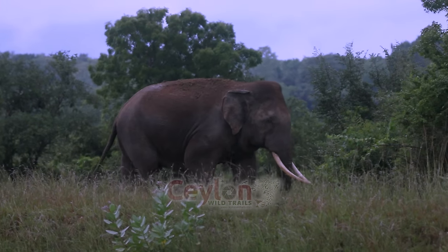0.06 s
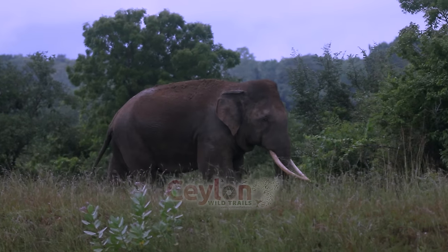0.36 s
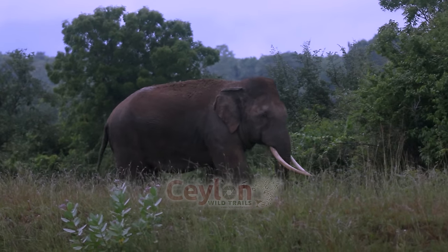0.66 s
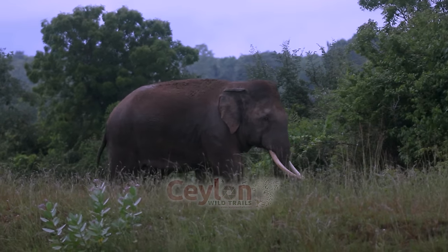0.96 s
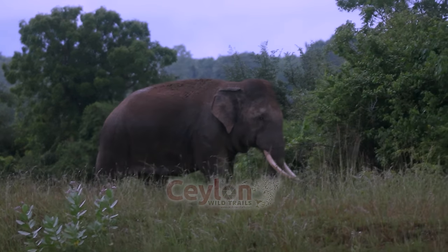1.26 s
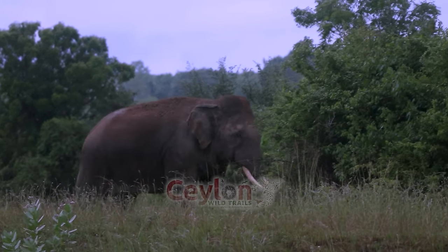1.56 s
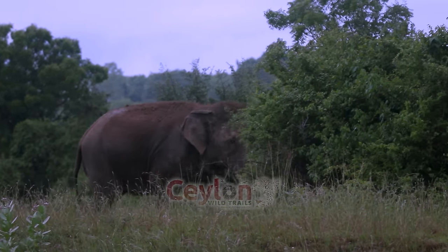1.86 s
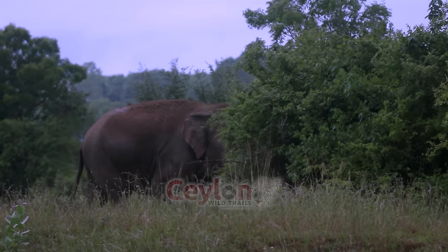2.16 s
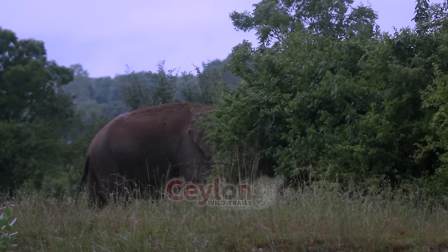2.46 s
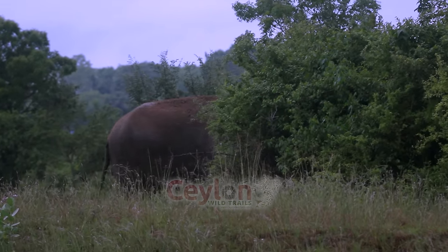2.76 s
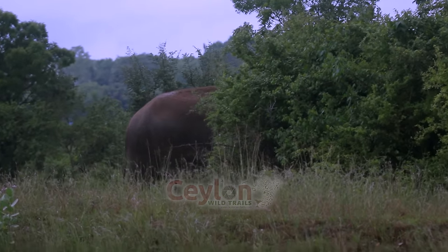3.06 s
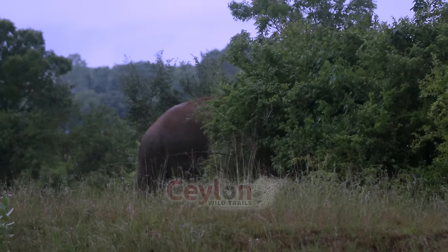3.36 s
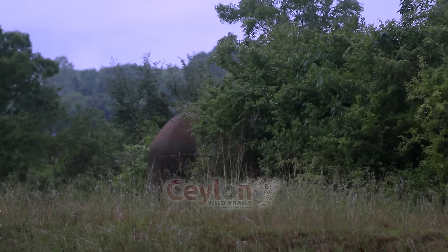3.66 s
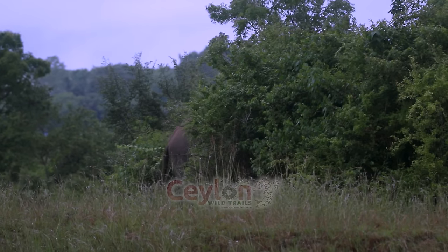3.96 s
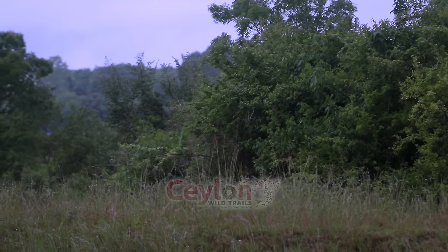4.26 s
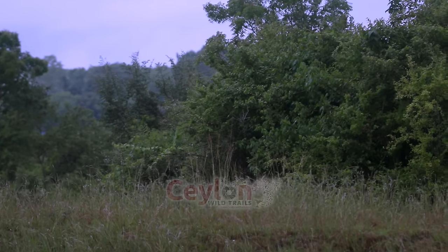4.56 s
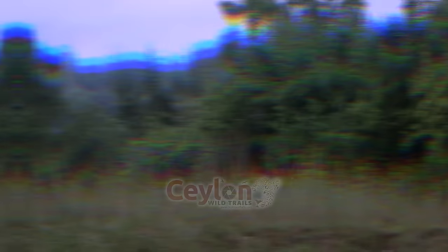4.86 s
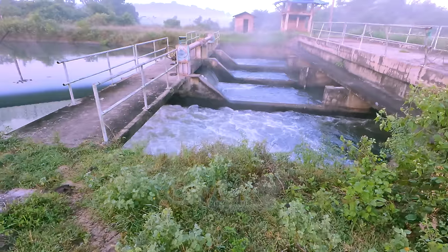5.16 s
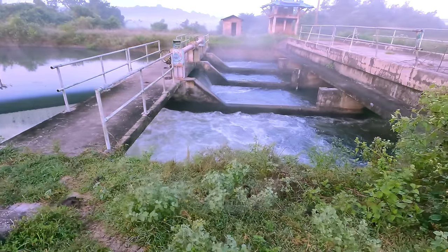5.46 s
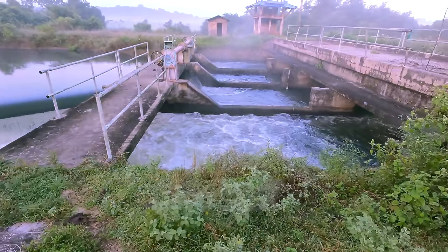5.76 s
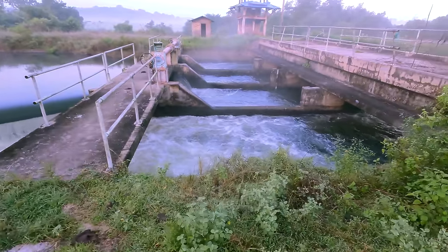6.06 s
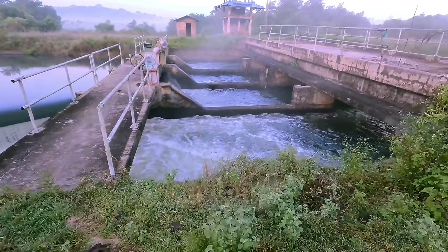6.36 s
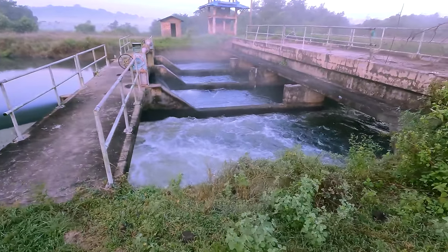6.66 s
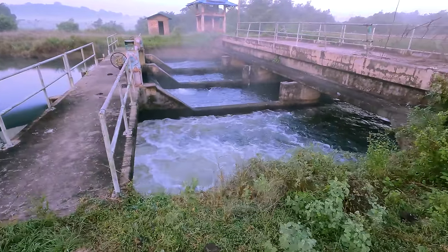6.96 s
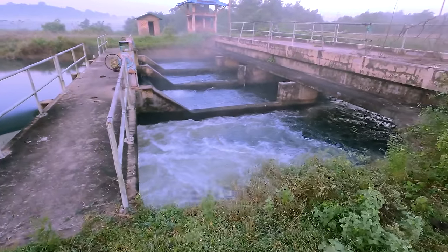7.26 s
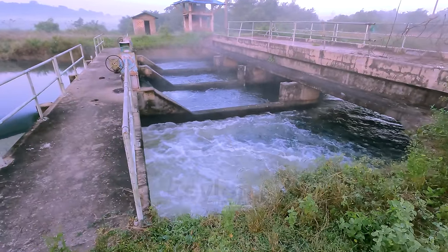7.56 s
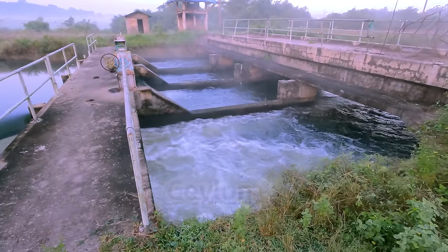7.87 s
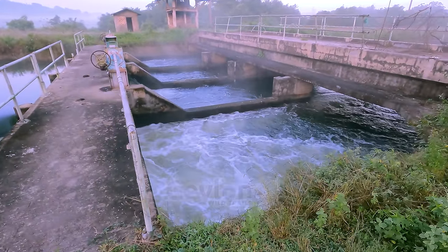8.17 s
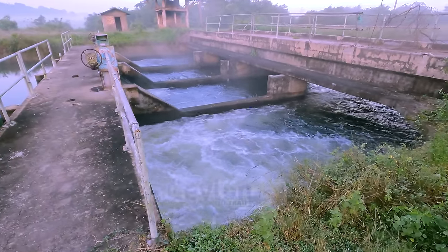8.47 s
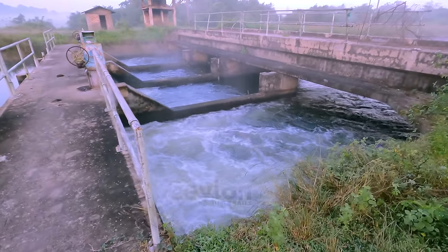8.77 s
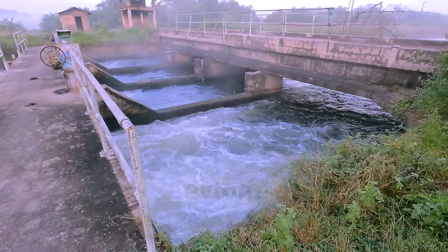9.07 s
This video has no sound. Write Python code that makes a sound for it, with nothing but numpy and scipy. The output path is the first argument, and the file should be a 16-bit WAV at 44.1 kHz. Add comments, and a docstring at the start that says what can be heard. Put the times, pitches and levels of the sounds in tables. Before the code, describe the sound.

Small birds twitter over soft cricket rasping before loud, churning sluice water abruptly takes over and keeps growing.

```python
"""A quiet scrub meadow, then, after an instant of silence, a canal sluice. In the meadow, distant air washes
over a low hum, bush crickets rasp their wings and small birds chip and whistle. At the sluice, water plunges
from the gates into a concrete basin: it rumbles, and the air it drags under rings as bubbles. The water grows
louder as the microphone walks closer, and slaps the surface twice. At the end the sound opens wider and turns
brighter."""
import sys
import numpy as np
from scipy import signal
from scipy.fft import rfft, irfft, next_fast_len
from scipy.io import wavfile
from scipy.ndimage import uniform_filter1d, map_coordinates

SR = 44100
rng = np.random.default_rng(int(sys.argv[2]) if len(sys.argv) > 2 else 0)


def materialize(psi):
    """Save the field psi as 16-bit PCM at rate SR to the path in sys.argv[1].

    A 1-D psi becomes a single channel; in a 2-D psi each row is a channel.
    """
    bounded = np.clip(np.atleast_2d(psi).T, -1, 1)
    quanta = np.round(bounded * 32767).astype(np.int16)
    wavfile.write(sys.argv[1], SR, quanta)


N = 402191
MEADOW_END_S, SLUICE_START_S = 4.941, 5.019


def amp(db):
    """Turn decibels (dB) into a number to multiply a sound by."""
    return 10 ** (np.asarray(db) / 20)


def unit(x):
    """Scale a sound so its average strength (rms) is 1."""
    return x / np.sqrt(np.mean(x ** 2) + 1e-20)


def along(points, hz):
    """Read between (Hz, value) points, with octaves evenly spaced."""
    point_hz, values = np.transpose(points)
    return np.interp(np.log(hz + 1), np.log(point_hz + 1), values)


def wobble(rate):
    """A smooth random curve through `rate` new values a second."""
    return map_coordinates(rng.standard_normal(int(N * rate / SR) + 4), [np.arange(N) * rate / SR])


def ramp(start_s):
    """Seconds gone by since start_s, zero before it."""
    return np.maximum(np.arange(N) / SR - start_s, 0)


def filtered(x, response):
    """Multiply each frequency in a sound by response(hz)."""
    size = next_fast_len(N + SR // 2)
    return irfft(rfft(x, size) * response(np.fft.rfftfreq(size, 1 / SR)), size)[..., :N]


def coloured(x, spectrum):
    """Shape a sound's tone with (Hz, dB) points, then scale it to strength 1."""
    return unit(filtered(x, lambda hz: amp(along(spectrum, hz))))


def patchy(depth_db):
    """White noise with random louder and softer patches in time and pitch."""
    grid = signal.stft(rng.standard_normal(N), nperseg=512)[2]
    patches = uniform_filter1d(rng.standard_normal(grid.shape), size=6, axis=0)
    patches = uniform_filter1d(patches, size=10, axis=1)
    return unit(signal.istft(grid * amp(depth_db * unit(patches)), nperseg=512)[1][:N])


def add(track, s, sound):
    """Mix a sound into a track, starting at s seconds."""
    start = round(s * SR)
    part = sound[max(-start, 0):N - start]
    track[max(start, 0):][:len(part)] += part


def air(level_db=-59.5, left_lead_s=.00004):
    """The far-off wash of open country, wide in the treble, reaching the left ear first."""
    # The tone of the wash. Each row: frequency in Hz, relative level in dB.
    tone = [(25, -30), (50, -13), (75, -12), (150, -3), (420, -1.5), (540, 2), (850, -1.5), (1000, 0),
            (1150, -3), (1750, -3.5), (2300, -6.5), (5000, -9.5), (9000, -18.5), (15700, -26)]
    # How alike the two ears are. Each row: frequency in Hz, likeness from 0 to 1.
    likeness = [(200, .96), (800, 0.93), (1500, 0.58), (2900, 0.31), (5500, 0.022)]
    spread = lambda hz: np.arccos(np.clip(along(likeness, hz), -1, 1)) / 2
    shares = lambda hz: [np.cos(spread(hz)), np.sin(spread(hz))]
    noise = np.array([patchy(depth_db=1.46), patchy(depth_db=.5)])
    mid, side = filtered(noise, lambda hz: amp(along(tone, hz)) * shares(hz))
    ears = np.array([mid + side, mid - side])
    ears = filtered(ears, lambda hz: np.exp(1j * np.pi * hz * left_lead_s * np.array([[1], [-1]])))
    return amp(level_db + .45 * wobble(3.06)) * unit(ears)


def hum(pitch_hz=98.6, level_db=-78):
    """A faint low tone that wavers in loudness and pitch."""
    gain = amp(level_db + 1.3 * wobble(7.84))
    phase = 2 * np.pi * np.cumsum(pitch_hz + 2 * wobble(8.2)) / SR
    return gain * unit(np.sin(phase))


def wing_rasp(lower_by_hz):
    """Each stroke of a cricket's wings is a burst of high, narrow noise."""
    # The tone of a wing. Each row: frequency in Hz, relative level in dB.
    tone = [(8800, -35), (9550, -11), (9850, -1), (10450, 0), (10750, -7), (11300, -28), (12500, -60)]
    stroke_hz = 149.5 + .86 * wobble(2)
    strokes = amp(3.7 * np.cos(2 * np.pi * np.cumsum(stroke_hz) / SR))
    noise = coloured(rng.standard_normal((2, N)), [(hz - lower_by_hz, db) for hz, db in tone])
    return unit(strokes * noise)


def crickets(swell_s=.58):
    """Bush crickets to the left: a steady chorus, and a nearer one that swells and stops dead."""
    # The near cricket's buzzes. Each row: start in seconds, stop in seconds.
    buzzes = [(0.6, 2.18), (2.4, 4.51), (4.6, 4.95)]
    t = np.arange(N) / SR
    effort = sum(np.minimum(ramp(start) / swell_s, 1) * (t < stop) for start, stop in buzzes)
    chorus = amp(-78.5) * wing_rasp(lower_by_hz=0)
    near = amp(-76.5) * effort * wing_rasp(lower_by_hz=110)
    return (chorus + near) * amp([[2.5], [-1.5]])  # left, right


def note(hz, db, rough):
    """A bird's whistle swells and fades along a pitch path, with a fast quiver."""
    swell = signal.windows.tukey(len(hz), .7)
    quiver, flutter = unit(uniform_filter1d(rng.standard_normal((2, len(hz))), size=130, axis=1))
    phase = 2 * np.pi * np.cumsum(hz * (1 + rough * quiver)) / SR
    return amp(db) * unit(swell * amp(2 * flutter) * np.sin(phase))


def arch(length_s, top_hz, bend, crest=0):
    """A pitch path that rises to a crest (-1 is the start, 1 the end) and falls away."""
    position = np.linspace(-1, 1, int(length_s * SR))
    crest = crest + rng.uniform(-.12, .12)
    away = np.abs(position - crest) / (1 + abs(crest))
    return top_hz * (1 - bend * rng.uniform(.8, 1.2) * away ** 1.7)


def near_birds(call_gap_s=.127, flick_gap_s=.054, sag_hz=100, fade_db=1.5):
    """Evenly paced calls, slurred answers, and runs of flicks that sink and fade."""
    # One bird's repeated calls. Each row: middle of the first call in seconds, number of calls,
    # top pitch in Hz, relative level in dB.
    phrases = [(0.6, 1, 5600, -66), (1.032, 4, 6120, -64.5), (1.56, 3, 6100, -65.5), (2.08, 1, 5750, -65.5),
               (2.959, 3, 6000, -66.5), (3.938, 2, 5950, -66.5)]
    # Another's answers. Each row: middle and length in seconds, top pitch in Hz, relative level in dB.
    slurs = [(0.3, .12, 5320, -68), (1.105, .096, 5470, -60), (1.602, .046, 5600, -62),
             (2.174, .08, 5300, -68), (2.877, 0.092, 5300, -68), (3.044, 0.035, 5420, -64),
             (3.128, 0.063, 5580, -62), (3.718, 0.075, 4660, -71), (4.419, .09, 6400, -67)]
    # Quick downward flicks. Each row: middle of the first flick in seconds, number of flicks,
    # first top pitch in Hz, first relative level in dB.
    runs = [(0.01, 2, 5150, -60.5), (0.37, 3, 5250, -68), (0.695, 4, 5450, -62.5), (1.9, 3, 5620, -66),
            (2.765, 2, 5650, -65), (3.255, 8, 5660, -63), (4.152, 3, 5430, -70), (4.492, 3, 5400, -64.5),
            (4.825, 3, 5500, -68)]
    notes = [(s + k * call_gap_s, arch(.078, hz, bend=.23), db)
             for s, count, hz, db in phrases for k in range(round(count))]
    notes += [(s, arch(length, hz, bend=.081), db) for s, length, hz, db in slurs]
    notes += [(s + k * flick_gap_s, arch(.024, hz - k * sag_hz, bend=.15, crest=-.6), db - k * fade_db)
              for s, count, hz, db in runs for k in range(round(count))]
    track = np.zeros(N)
    for middle_s, path, db in notes:
        add(track, middle_s - len(path) / SR / 2, note(path, db, rough=.007))
    return amp(-2.5) * track


def flock(near, count=380, memory_s=.3):
    """A flock farther back twitters in tiny flicks, louder while the near birds call."""
    track = np.zeros(N)
    for when, pitch, span, slope, strength, kind in rng.random((count, 6)):
        high = kind < .14  # a few flicks are higher and softer
        centre_hz = (7000 + 1400 * pitch) if high else (3700 + 1850 * np.sqrt(pitch))
        position = np.linspace(-1, 1, int((.012 + .02 * span) * SR))
        glide = .07 - .18 * slope  # most fall
        flick = note(centre_hz * (1 + glide * position), 6 * strength - 6 * high, rough=.012)
        add(track, when * MEADOW_END_S, flick)
    calling = np.sqrt(np.abs(uniform_filter1d(near ** 2, int(memory_s * SR))))
    return np.hypot(amp(-86), amp(-6) * calling) * unit(track)


def far_birds():
    """Distant birds slide through short whistles."""
    # The whistles. Each row: start and length in seconds, first and last pitch in Hz,
    # relative level in dB.
    whistles = [(.1, 0.085, 4400, 3970, -70), (2.075, .07, 4130, 3910, -69), (2.099, .14, 1890, 1980, -74),
                (2.347, 0.13, 1016, 940, -69), (2.658, 0.16, 2140, 2020, -75),
                (2.851, .16, 1690, 1550, -72), (2.877, 0.077, 1000, 980, -66.5),
                (3.5, 0.032, 7200, 6600, -74), (4.41, .03, 7870, 7210, -73), (4.42, .06, 6400, 6800, -77.5)]
    track = np.zeros(N)
    for s, length, start_hz, end_hz, db in whistles:
        add(track, s, note(np.linspace(start_hz, end_hz, int(length * SR)), db - 2.5, rough=.012))
    return track


def among_trees(x, echo_db, fade_s):
    """A sound plus its scatter from leaves and trunks, different at each ear."""
    t = np.arange(SR // 2) / SR
    tail = rng.standard_normal((2, len(t))) * amp(-60 * t / fade_s) * (1 - np.exp(-t / .0038))
    tail /= np.linalg.norm(tail[0])
    return x + amp(echo_db) * signal.fftconvolve(x[None], tail, axes=1)[:, :N]


def birds():
    """All the birds among the trees; the distant ones echo longer."""
    near, far = near_birds(), far_birds()
    chatter = among_trees(near + flock(near), echo_db=-6.5, fade_s=.068)
    return chatter + among_trees(far, echo_db=0, fade_s=.6)


def plunge():
    """The falling jet pounds the basin and makes it rumble."""
    # The tone of the rumble. Each row: frequency in Hz, relative level in dB.
    tone = [(12, -14), (24, -4), (40, -3), (60, 0), (85, 1.5), (102, -1), (145, 0), (210, -4.5),
            (300, -12.5), (400, -19.5), (800, -73)]
    return amp(-27 + .31 * wobble(10)) * coloured(patchy(depth_db=.54), tone)


def bubbles(count, low_hz, high_hz, cycles, spread_db):
    """Air pockets ring for a few cycles, rising in pitch as they near the surface."""
    when, pitch, strength, span = rng.random((count, 4)).T[:, :, None]
    hz = low_hz * (high_hz / low_hz) ** pitch
    t = np.arange(int(np.clip(3 * cycles / low_hz * SR, 64, 1500))) / SR
    age = t * hz / (cycles * (.5 + span))
    gain = amp(spread_db * np.minimum(-np.log(1 - strength), 5)) * hz / low_hz  # a few stand out
    phase = 2 * np.pi * hz * t * (1 + .065 * np.minimum(age, 2))
    ring = gain * np.exp(-3 * age) * (1 - np.exp(-20 * age)) * np.sin(phase)
    start = (SLUICE_START_S + when * (N / SR - SLUICE_START_S)) * SR
    index = start.astype(int) + np.arange(len(t))
    track = np.bincount(index.ravel(), ring.ravel(), N)[:N]  # add up all the rings
    return track / np.std(track[round(SLUICE_START_S * SR):])


def froth(surge):
    """Air dragged under by the jet gurgles as large bubbles."""
    # The tone of the froth. Each row: frequency in Hz, relative level in dB.
    tone = [(120, -25), (260, 6), (370, 1.5), (520, 3), (720, 0), (1150, -3), (1500, -5.5), (1900, -12),
            (2500, -24.5), (4000, -63)]
    gurgle = amp(-9) * bubbles(count=5000, low_hz=350, high_hz=2600, cycles=6, spread_db=1.5)
    return amp(-31.5 + .72 * surge) * coloured(patchy(depth_db=0) + gurgle, tone)


def fizz(surge):
    """Tiny bubbles ring high and short, making a crackle."""
    # The tone of the fizz. Each row: frequency in Hz, relative level in dB.
    tone = [(1000, -56), (1700, 1), (2200, 1), (2800, -0.5), (3300, -4.5), (3750, -4), (4900, -10.5),
            (5500, -13.5), (6100, -23.5), (6700, -26), (8400, -37.5), (10800, -38.5), (13500, -48),
            (15700, -56)]
    crackle = amp(-9) * bubbles(count=14000, low_hz=1800, high_hz=7500, cycles=4, spread_db=2.2)
    return amp(-39 + .15 * surge) * coloured(patchy(depth_db=.34) + crackle, tone)


def wide_fizz():
    """Fine fizz comes from the whole width of the pool."""
    # The tone of the fine fizz. Each row: frequency in Hz, relative level in dB.
    tone = [(1100, -36), (1700, -33), (3500, 2), (5000, 11), (6500, 1), (8000, -32)]
    return amp(-68.5) * coloured(rng.standard_normal(N), tone)


def hiss():
    """A thin, high hiss in the right ear only."""
    # The tone of the hiss. Each row: frequency in Hz, relative level in dB.
    tone = [(10000, -40), (11400, -10), (12200, 0), (13200, -5), (14200, -12), (15700, -20)]
    return amp(-71.2) * coloured(rng.standard_normal(N), tone) * np.array([[0], [1]])


def nearness(start_s=5.56, distance_m=10.6, speed_m_per_s=.8):
    """How many times stronger the water sounds as the walk shortens the distance."""
    return distance_m / np.maximum(distance_m - speed_m_per_s * ramp(start_s), 1)


def slaps(fade_s=.025):
    """A lump of water smacks the surface with a short, broad crack."""
    # The smacks. Each row: start in seconds, pitch in Hz, peak level in dB.
    smacks = [(7.416, 2100, -23), (8.638, 1800, -17)]
    track, t = np.zeros(N), np.arange(SR // 30) / SR
    for s, hz, db in smacks:
        band = signal.butter(4, [hz * .6, hz * 1.45], "band", fs=SR, output="sos")
        crack = signal.sosfilt(band, amp(-60 * t / fade_s) * rng.standard_normal(len(t)))
        add(track, s, amp(db) * crack / np.max(np.abs(crack)))
    return track


def late_width(split_hz=1200):
    """Near the end the sound opens wide between the ears: first the highs, then the lows."""
    # The tone of the wide sound. Each row: frequency in Hz, relative level in dB.
    tone = [(100, -35), (350, -11), (800, -8), (2000, -4), (2900, 0), (4000, -4), (5500, -13), (6500, -22),
            (9000, -32), (15000, -45)]
    rush = coloured(rng.standard_normal(N), tone)
    lows = filtered(rush, lambda hz: 1 / (1 + (hz / split_hz) ** 4))
    return amp(-42) * ramp(start_s=8.2) * (rush - lows) + amp(-35.5) * ramp(start_s=8.68) * lows


def spray():
    """Bursting foam sizzles very high, growing steadily near the end."""
    # The tone of the spray. Each row: frequency in Hz, relative level in dB.
    tone = [(4500, -40), (6200, -2), (7500, 2.5), (8500, -3), (10200, -6), (11500, -11.5), (13000, -19.5),
            (15500, -32)]
    droplets = amp(-7) * bubbles(count=12000, low_hz=5500, high_hz=14000, cycles=3, spread_db=2.5)
    return amp(-55) * ramp(start_s=8.21) * coloured(patchy(depth_db=1) + droplets, tone)


def sluice():
    """All the water, louder as we come closer; the fizz grows faster than the rumble."""
    surge = wobble(7)  # the churning water heaves, lifting froth and fizz together
    near = nearness()
    centre = near * (plunge() + froth(surge)) + near ** 1.43 * fizz(surge)
    sides = np.array([[1], [-1]])  # opposite signs at the two ears sound wide
    pool = centre + near * wide_fizz() * sides + slaps()
    return pool + late_width() * sides + spray() + near * hiss()


def scene():
    """The meadow, a blink of silence, then the sluice."""
    t = np.arange(N) / SR
    meadow = air() + hum() + crickets() + birds()
    return meadow * (t < MEADOW_END_S) + sluice() * (t >= SLUICE_START_S)


def record(dry):
    """Cut away the very highest treble, above about 15.7 kHz."""
    return filtered(dry, lambda hz: np.clip((15720 - hz) / 100 + .5, 0, 1))


dry = scene()
out = record(dry)
materialize(out)
```